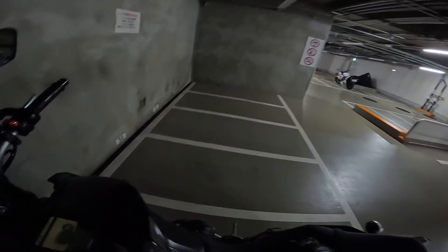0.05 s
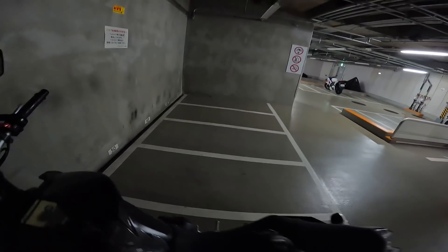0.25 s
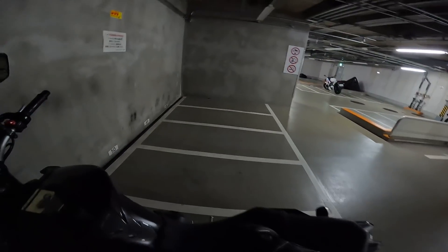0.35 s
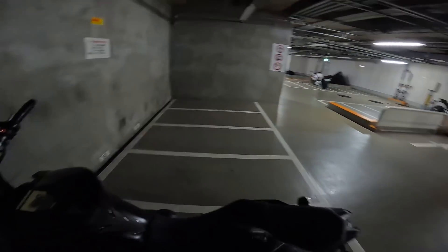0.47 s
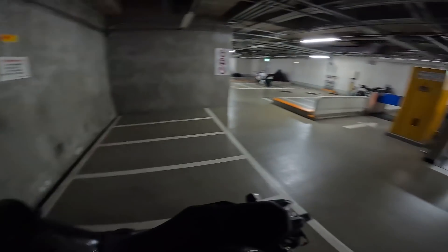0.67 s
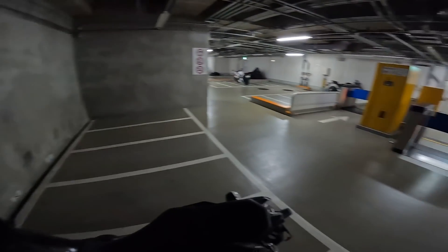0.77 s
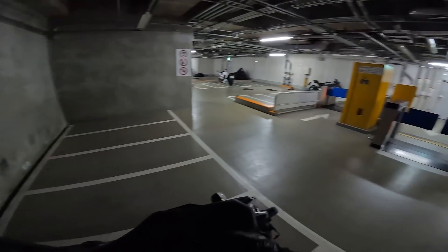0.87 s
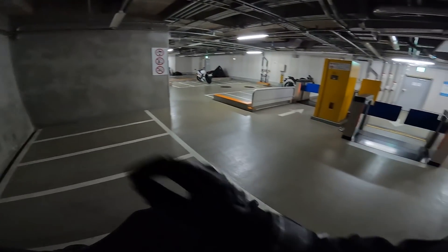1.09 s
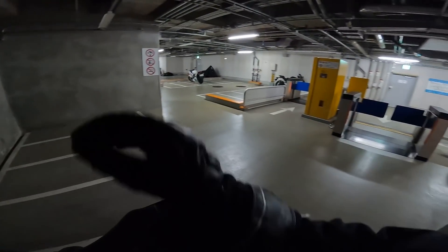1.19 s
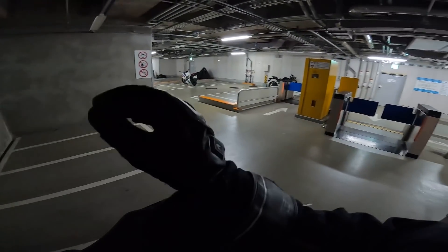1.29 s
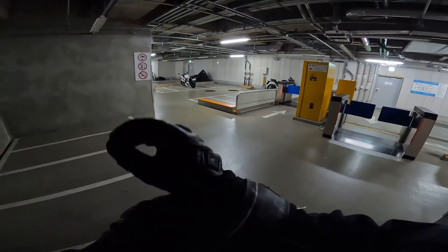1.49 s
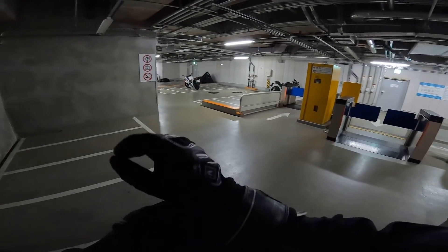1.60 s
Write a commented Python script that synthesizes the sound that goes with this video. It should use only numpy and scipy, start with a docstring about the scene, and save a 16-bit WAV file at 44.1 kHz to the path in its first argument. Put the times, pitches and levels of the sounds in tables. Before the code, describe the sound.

At about 0.2 seconds a heavy door slams slightly left, its latch rattling into a loud thud. The echo fades through the concrete garage over a second or so, while a deep boom lingers. Close by, buckles tick faintly between 0.3 and 0.5 seconds, a glove knocks the handlebar at 0.8 and more softly at 1.4, and sleeves rustle quietly. Ventilation rumbles faintly throughout.

```python
"""Door slam in an underground garage

Something heavy, most likely a door, slams shut in a concrete garage, heard in stereo. Its latch
rattles, the panel thuds, the walls throw back a few echoes and a long tail, and a low room mode booms on.
Near the microphone a rider's jacket and gloves rustle, tick and knock over the ventilation's rumble."""
import sys
import numpy as np
from scipy import signal
from scipy.fft import rfft, irfft
from scipy.io import wavfile

SR = 44100
rng = np.random.default_rng(int(sys.argv[2]) if len(sys.argv) > 2 else 0)


def wrap_up_sound(samples):
    """Save the sound to the file named by the first command line argument, as 16-bit audio."""
    columns = np.atleast_2d(samples).T
    # keep every value between -1 and 1, then stretch to whole-number steps
    tamed = np.clip(columns, -1, 1)
    steps = np.round(tamed * 32767).astype(np.int16)
    wavfile.write(sys.argv[1], SR, steps)


N = 72765


def from_db(db):
    """Decibels to gain."""
    return 10 ** (np.asarray(db) / 20)


def seconds():
    """The time of every sample."""
    return np.arange(N) / SR


def at_hz(points, hz):
    """Read a table on a log-frequency axis."""
    f, value = np.transpose(points)
    return np.interp(np.log(np.maximum(hz, 1)), np.log(f), value)


def pan(db):
    """Left and right gains for a left-minus-right level."""
    return from_db(np.array([[.5], [-.5]]) * db)


def delay(x, s):
    """The same sound, s seconds later."""
    return np.interp(seconds() - s, seconds(), x, left=0)


def noise(colour):
    """Coloured stereo noise of rms 1, much alike in both channels and centred in the highest treble."""
    # left-right likeness: f/Hz, correlation/0-1
    likeness = [(60, 0.69), (250, 0.85), (600, 0.9), (1200, 0.7), (2500, 0.77), (4500, 0.64), (7500, 0.91),
                (15000, 1)]
    hz = np.fft.rfftfreq(N, 1 / SR)
    mid, side = rfft(rng.standard_normal((2, N)))
    alike = np.clip(at_hz(likeness, hz), 0, 1)
    spectrum = np.sqrt(1 + alike) * mid + np.sqrt(1 - alike) * side * [[1], [-1]]
    x = irfft(from_db(at_hz(colour, hz)) * spectrum, N)
    return x / x.std()


def dying(start, t60, rise=1 / SR):
    """An envelope that rises in a line and dies exponentially."""
    age = np.maximum(seconds() - start, 0)
    return np.minimum(age / rise, 1) * np.exp(-np.log(1000) * age / t60)


def struck(start, modes, rise=1 / SR):
    """Decaying sines set off together, with alternating signs."""
    age = seconds() - start
    return sum((-1) ** k * from_db(db) * dying(start, t60, rise) * np.sin(2 * np.pi * hz * age)
               for k, (hz, db, t60) in enumerate(modes))


def stroke(start, attack, hold, release, db):
    """The gain of one sliding movement: it speeds up, holds and slows."""
    return from_db(db) * np.interp(seconds(), start + np.cumsum([0, attack, hold, release]), [0, 1, 1, 0])


def ventilation():
    """Room tone: the steady rumble of the garage's ventilation, slightly left."""
    # moving air: f/Hz, level/dB
    colour = [(20, 0), (50, 1), (75, -4), (150, -4.5), (280, -9), (400, -4), (540, -11.5), (780, -6),
              (1400, -12.5), (2000, -18.5), (3000, -22), (5500, -31), (10000, -33), (16000, -39.5)]
    return from_db(-52.5) * noise(colour) * pan(db=1.4)


def handling():
    """Low handling rumble on the microphone as the arm moves."""
    # course of the rumble: t/s, level/dB
    course = [(0, -54), (.12, -61), (1.05, -62), (1.22, -55), (1.44, -58), (1.65, -68)]
    # its spectrum: f/Hz, level/dB
    colour = [(20, 36.5), (60, 29), (110, 14.5), (200, 11), (400, -18), (900, -23), (2000, -85),
              (8000, -34)]
    return noise(colour) * from_db(np.interp(seconds(), *np.transpose(course)))


def body_bumps():
    """The rider's moving body makes dull, low bumps."""
    # bumps: t/s, level/dB
    bumps = [(.168, -48), (.915, -54), (1.225, -52), (1.425, -48)]
    # their resonances: f/Hz, level/dB, t60/s
    modes = [(71, 1, .14), (109, 9.5, 0.067), (192, -2, 0.047)]
    return sum(from_db(db) * struck(s, modes, rise=0.0054) for s, db in bumps)


def sleeves():
    """Close up, cloth slides in grainy strokes; the raised glove swishes with a faint leathery squeak."""
    # sleeve strokes: t/s, attack/s, hold/s, release/s, level/dB, treble/dB
    strokes = [(0, .04, .12, .04, -56.5, -10), (.13, .04, .015, .03, -59, 2),
               (.77, .006, .08, .16, -52, 1.8), (1.125, .06, .15, .11, -56.5, -2)]
    # glove stroke: t/s, attack/s, hold/s, release/s, level/dB
    swish = (1.44, .05, .035, .055, -52.5)
    # spectra of the cloth's body, its hiss and the glove: f/Hz, level/dB
    body_colour = [(100, -2), (400, 8.5), (550, 7.5), (930, 5.5), (1400, -1), (1900, -4.5), (2400, -6),
                   (3300, -9), (5000, -19), (16000, -55)]
    hiss_colour = [(2000, 6), (5000, -6), (9000, -3.5), (12500, -5.5), (16000, -15)]
    glove_colour = [(200, -8), (700, -5), (930, 4), (1150, -2), (2000, -9), (2350, -2), (2700, -7),
                    (3400, -6), (5500, -15), (12500, -13), (16000, -18)]
    grains_per_s, grain_db, hiss_db = 630, 1.2, -8
    body, hiss = noise(body_colour), noise(hiss_colour)
    grain_times = np.arange(0, N / SR, 1 / grains_per_s)
    roughness = np.interp(seconds(), grain_times, rng.standard_normal(N)[:len(grain_times)])
    cloth = sum(stroke(*move) * (body + from_db(hiss_db + treble_db) * hiss)
                for *move, treble_db in strokes)
    glove = stroke(*swish) * noise(glove_colour)
    return from_db(grain_db * roughness) * (from_db(2.5) * cloth + glove)


def buckles():
    """Buckles tick close by: tiny bursts of noise, each peaking at its own ring."""
    # ticks: t/s, level/dB, ring f/Hz
    ticks = [(0.2828, -48, 11500), (0.3183, -42.5, 10500), (0.4960, -47, 7800), (1.1415, -60, 4500)]
    width, skirt_db = 2 ** 1.2, -21  # the skirts lie 1.2 octaves either side
    out = 0
    for s, db, hz in ticks:
        ring = noise([(hz / width, skirt_db), (hz, 0), (hz * width, skirt_db)])
        out = out + from_db(db) * dying(s, t60=0.023) * ring
    return out


def handlebar():
    """A glove knocks softly on the handlebar, which rings briefly."""
    # knocks: t/s, level/dB
    knocks = [(0.8059, -31), (0.822, -39), (1.388, -43.5)]
    # handlebar modes: f/Hz, level/dB, t60/s
    modes = [(332, -10.5, 0.077), (454, -5.5, 0.053), (735, -1, 0.032), (910, -6, 0.018)]
    return sum(from_db(db) * struck(s, modes) for s, db in knocks)


def room_boom():
    """Two deep room modes swell and beat, reaching the right channel a little late."""
    # room modes: f/Hz, level/dB, t60/s
    modes = [(52.0, -32, 4.23), (48, -50, 1.9)]
    boom = struck(.195, modes, rise=.125)
    return np.array([boom, delay(boom, .0007)]) * pan(db=0.8)


def garage_tail():
    """Dense reflections off the concrete die band by band, lows last; a few pitches stand out."""
    # diffuse tail: f/Hz, level/dB
    colour = [(30, -5), (80, -13), (160, -6), (280, -7), (420, -4), (530, -8), (650, -5.5), (730, -3.5),
              (850, -0.5), (1030, -4), (1200, -3), (1410, 2), (1550, -5), (1750, -14), (2100, -14),
              (2500, -14), (3300, -20.5), (5000, -29), (10000, -38.5), (16000, -50)]
    # its stereo balance: f/Hz, left minus right/dB
    balance = [(130, -1), (500, 0.5), (4000, 1.5), (10000, 1)]
    # its decay by band: f/Hz, t60/s
    decays = [(60, 2.6), (150, 2.05), (400, 1.42), (900, 1.38), (1500, 1.01), (3000, 1.01), (6000, 0.74),
              (14000, 1.47)]
    # lingering pitches: f/Hz, level/dB, t60/s
    modes = [(144, -8, 1.7), (171, -7, 1.5), (277, -6, 1.2), (372, -1, 1.1), (443, -5, 1.1), (627, 2, 1.0),
             (655, -2, 1.0), (761, -1, 1.0), (806, -2, 1.0), (836, -1, 1.0), (931, 1, 1.0), (1103, -2, 1.0),
             (1383, -1, .95), (2509, -12, .8)]
    start_s = .2075
    hz = np.fft.rfftfreq(N, 1 / SR)
    wash = rfft(noise(colour)) * pan(at_hz(balance, hz))
    centres = [f for f, _ in decays]
    tail = 0
    for share, (_, t60) in zip(np.eye(len(centres)), decays):
        band = irfft(wash * at_hz(list(zip(centres, share)), hz), N)  # overlapping triangular bands
        tail = tail + band * dying(start_s, t60, rise=0.0066)
    lingering = struck(start_s, modes, rise=0.046) * pan(db=2.5)
    return from_db(-21.5) * tail + from_db(-32.5) * lingering


def latch():
    """Short metallic rasps as the bolt rides over the catch."""
    # catches: t/s, level/dB, low-pass f/Hz, t60/s, left minus right/dB
    catches = [(0.196, -39, 4500, 0.097, 9), (0.2005, -26.5, 9300, 0.14, 2), (0.2116, -28, 14900, 0.047, 2)]
    # spectrum of the rasp: f/Hz, level/dB
    colour = [(90, 1), (250, 12), (700, 11.5), (1300, 9.5), (2600, 1.5), (5000, -5), (9000, -3),
              (11500, -1), (16000, -17)]
    out = 0
    for s, db, top_hz, t60, side_db in catches:
        low_pass = signal.butter(4, top_hz, fs=SR, output="sos")
        rasp = signal.sosfilt(low_pass, noise(colour) * dying(s, t60))
        out = out + from_db(db) * pan(side_db) * rasp
    return out


def door_panel():
    """Left of the microphone the panel hits its frame and rings; the nearest walls repeat the thud."""
    # contacts with the frame: t/s, level/dB
    blows = [(0.2035, -44), (0.2095, -22), (0.2142, -15.5)]
    # panel modes: f/Hz, level/dB, t60/s
    modes = [(178, -18.5, 0.04), (376, -39, 0.023), (653, -4, 0.044), (770.5, -2, 0.14), (944, -4.5, 0.047),
             (1133, 1.5, 0.046), (1453, -6, 0.077), (2420, -12.5, 0.064)]
    # wall echoes: delay/s, level/dB, left minus right/dB
    echoes = [(.0298, -7, 2), (.047, -10, 2), (.102, -13, 2)]
    thud = sum(from_db(db) * struck(s, modes) for s, db in blows)
    direct = np.array([thud, delay(thud, .0001)]) * pan(db=6)
    return direct + sum(from_db(db) * pan(side_db) * delay(thud, s) for s, db, side_db in echoes)


def scene():
    """At the microphone: the slam filling the garage, the rider close by and the room tone."""
    slam = latch() + door_panel() + garage_tail() + room_boom()
    rider = buckles() + handlebar() + body_bumps() + handling() + sleeves()
    return slam + rider + ventilation()


def record(dry):
    """The recorder cuts the deepest bass and the top."""
    low_cut = signal.butter(2, 18, "high", fs=SR, output="sos")
    top_cut = signal.ellip(10, .2, 80, 15850, fs=SR, output="sos")
    return signal.sosfilt(top_cut, signal.sosfilt(low_cut, dry))


dry = scene()
out = record(dry)
wrap_up_sound(out)
```